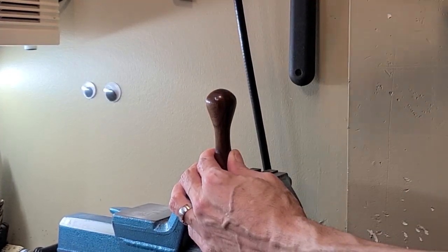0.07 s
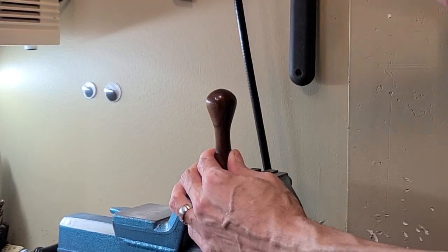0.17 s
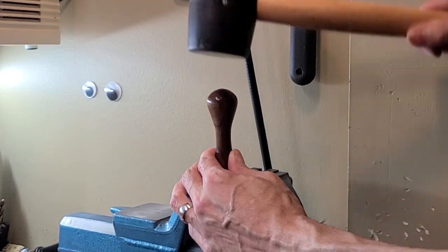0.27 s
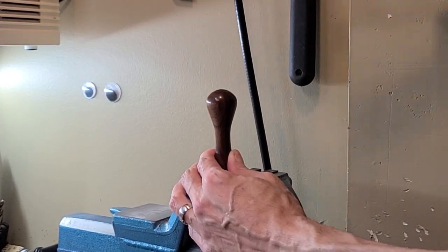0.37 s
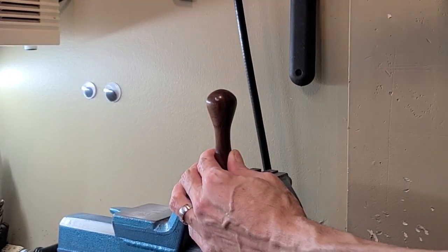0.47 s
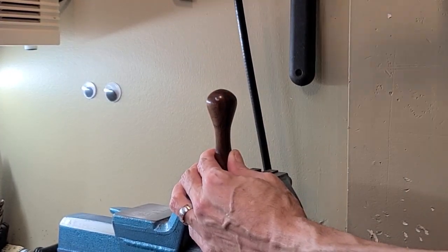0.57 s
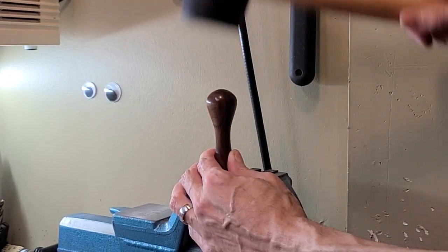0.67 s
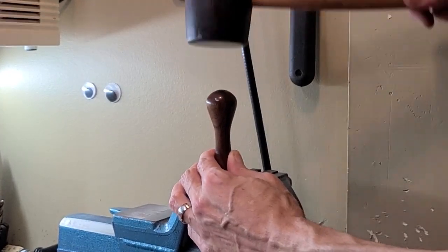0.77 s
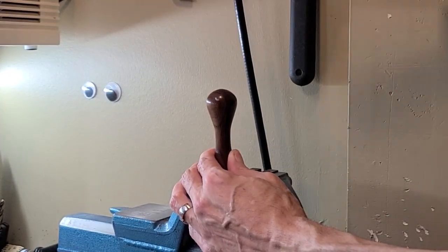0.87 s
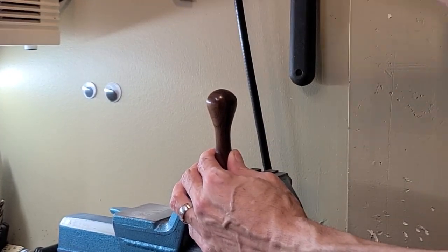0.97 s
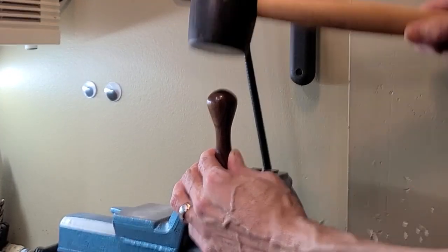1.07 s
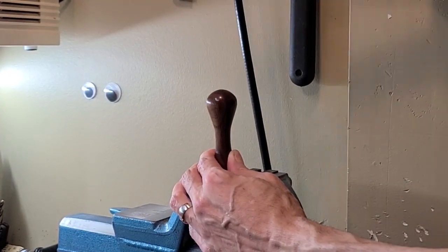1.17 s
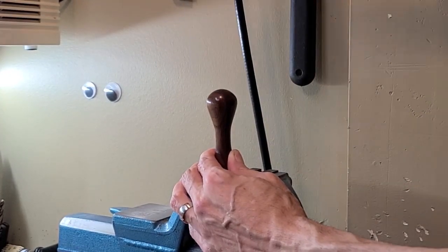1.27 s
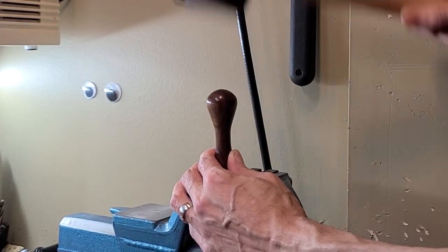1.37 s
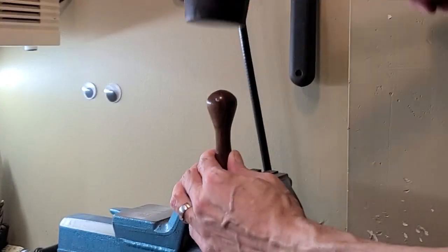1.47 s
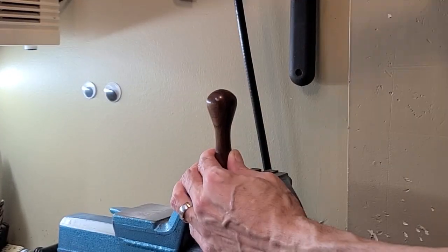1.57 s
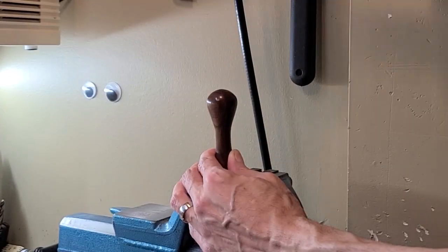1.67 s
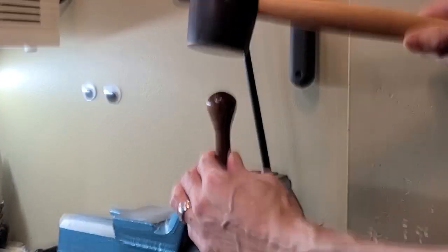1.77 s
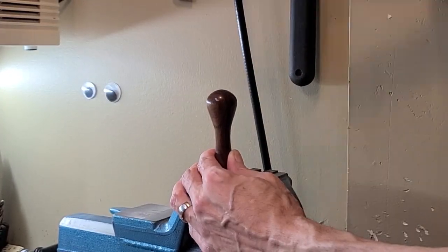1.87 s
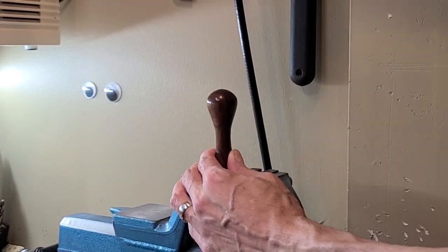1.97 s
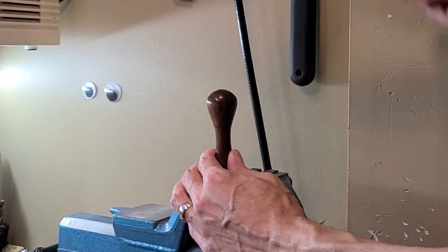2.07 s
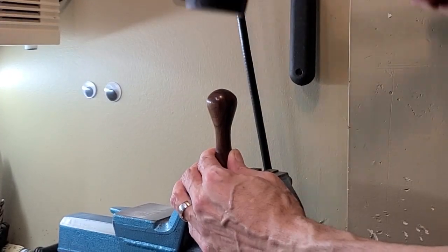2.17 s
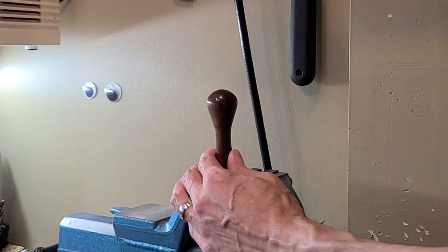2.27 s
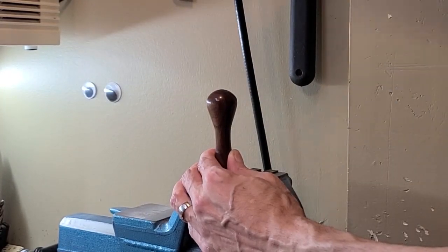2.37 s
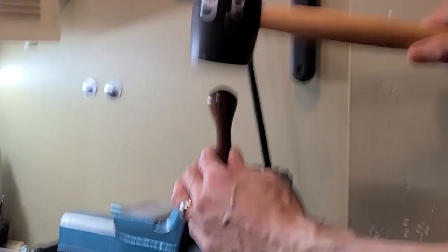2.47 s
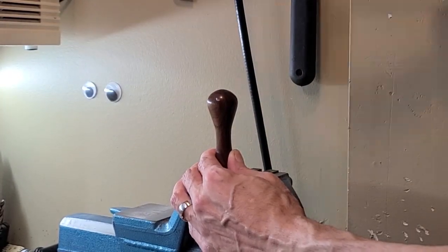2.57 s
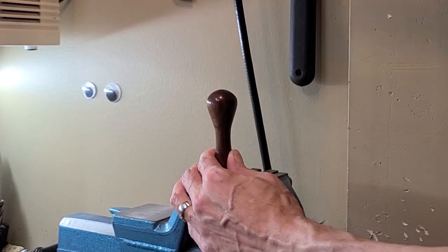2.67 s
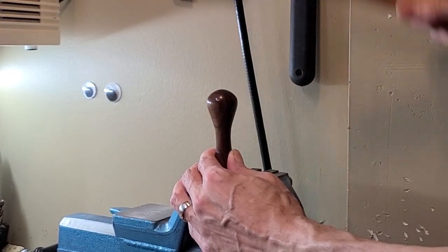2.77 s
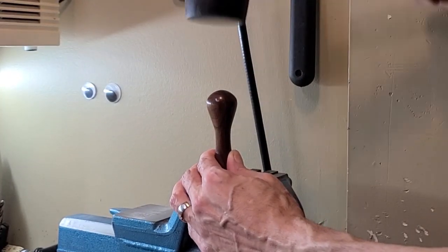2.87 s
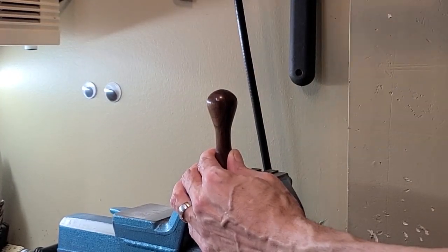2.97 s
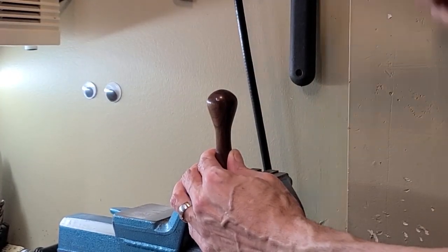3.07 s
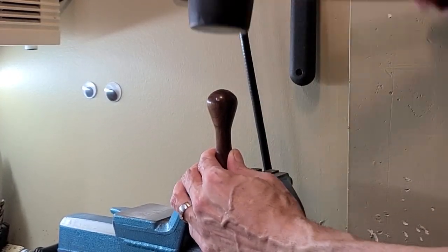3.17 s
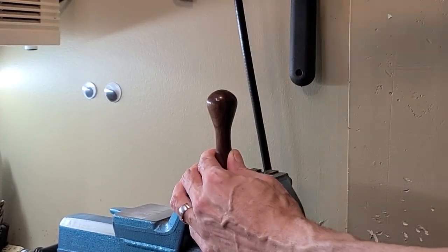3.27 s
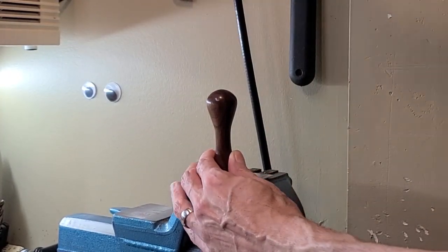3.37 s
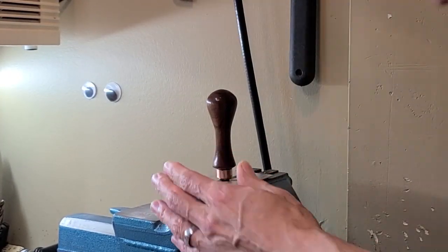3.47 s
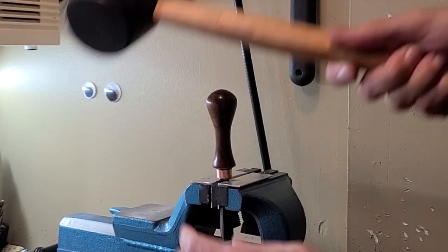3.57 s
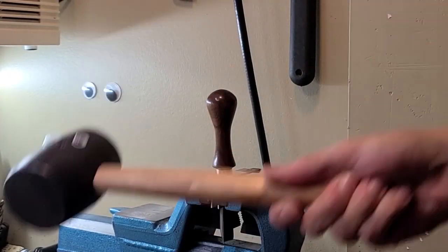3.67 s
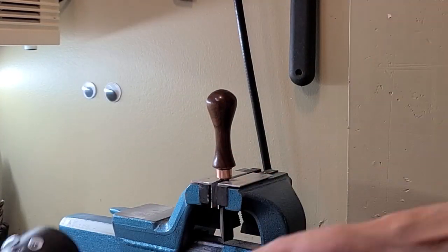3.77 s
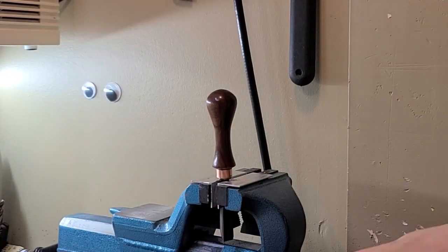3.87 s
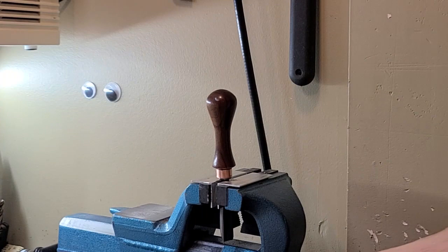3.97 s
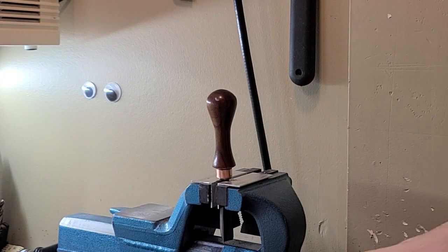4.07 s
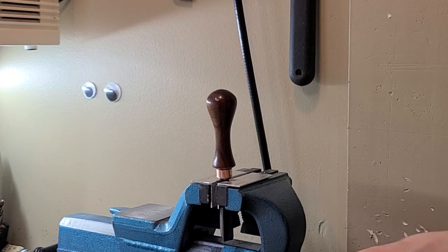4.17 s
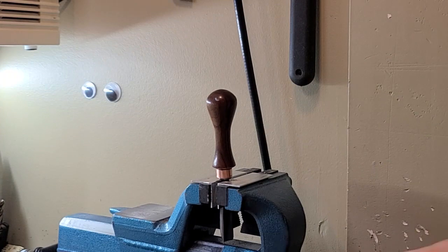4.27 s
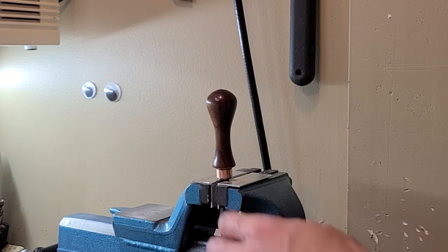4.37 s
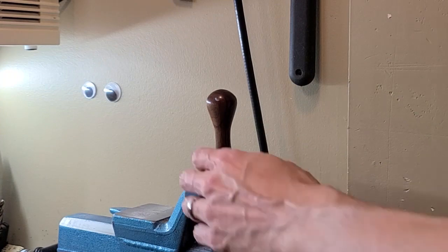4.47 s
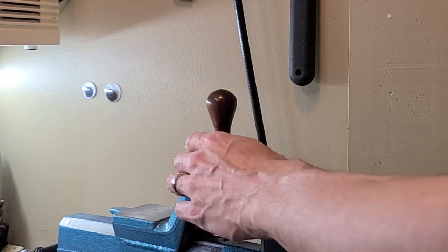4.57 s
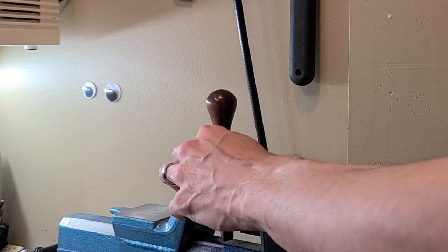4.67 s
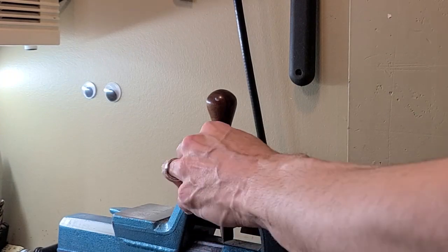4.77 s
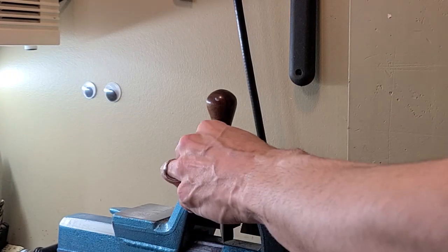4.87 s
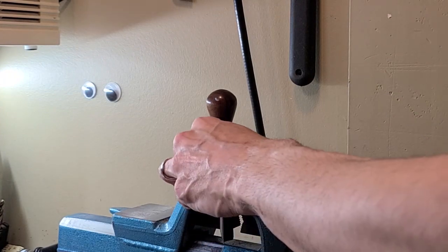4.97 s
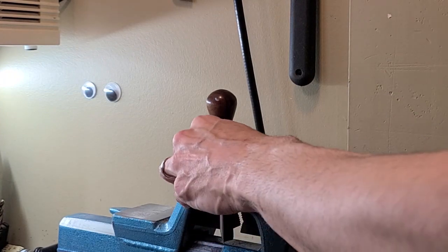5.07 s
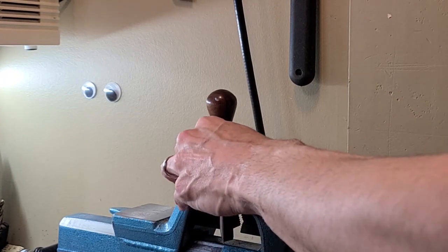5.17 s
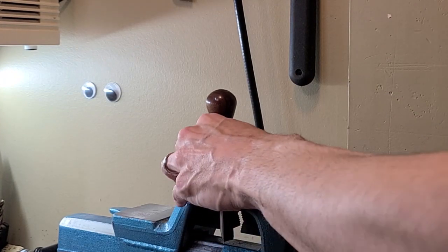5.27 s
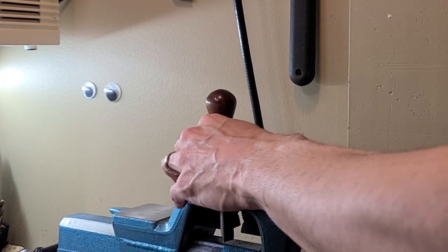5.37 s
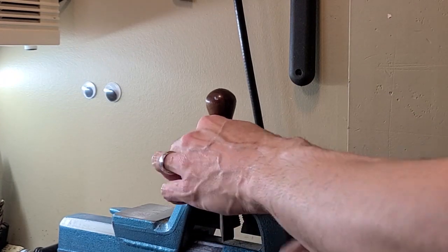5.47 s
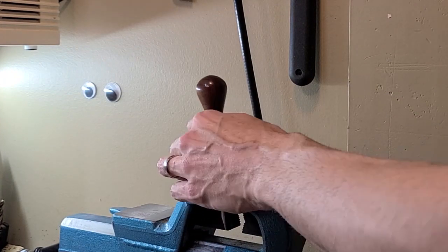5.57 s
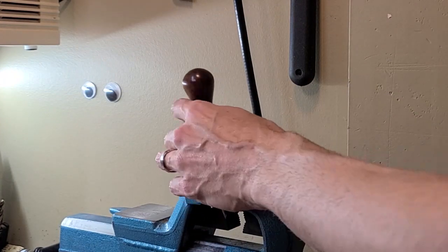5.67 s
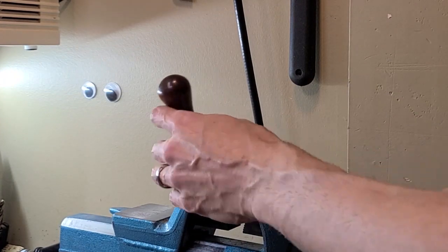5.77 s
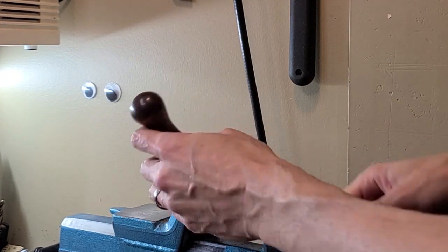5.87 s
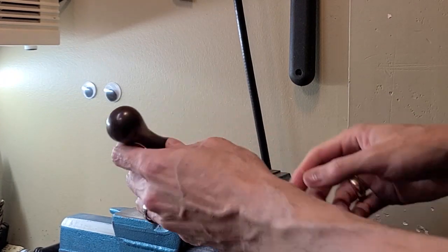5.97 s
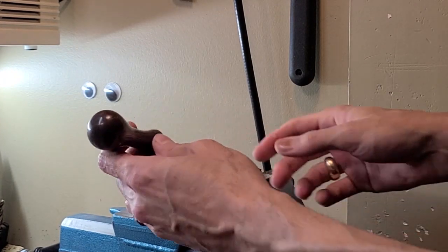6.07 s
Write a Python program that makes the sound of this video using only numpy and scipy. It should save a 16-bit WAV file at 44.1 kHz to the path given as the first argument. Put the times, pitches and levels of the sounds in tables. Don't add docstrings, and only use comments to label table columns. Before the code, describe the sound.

Nine steady, loud mallet blows, each a blunt thud with a woody crack, short metallic rattle and low ringing bench tail. Then only still air and faint hum, broken by a small ringing steel clink and a brief clack. Finally irregular bright knocks, short gritty scrapes and dry skin rubs as the tool is pulled from the vise. Close phone pickup in a small room, peaks slightly rounded.

```python
import sys
import numpy as np
from scipy import signal
from scipy.fft import rfft, irfft, next_fast_len
from scipy.io import wavfile
from scipy.ndimage import uniform_filter1d

SR = 44100
rng = np.random.default_rng(int(sys.argv[2]) if len(sys.argv) > 2 else 0)


def waveform_to_disk(signal):
    frames = np.transpose(np.atleast_2d(signal))
    scaled = np.clip(frames, -1, 1) * 32767
    samples = np.round(scaled).astype(np.int16)
    wavfile.write(sys.argv[1], SR, samples)


def voltage_ratio(decibels):
    exponent = np.asarray(decibels, float) / 20
    return 10 ** exponent


N = 270320


def unit(x):
    return x / np.sqrt(np.mean(x ** 2))


def along(table, hz):
    table_hz, values = np.array(table).T
    return np.interp(np.log(hz), np.log(table_hz), values)


def sides(pan_db):
    return voltage_ratio(np.array([[pan_db], [-pan_db]]) / 2)


def seconds(count):
    return np.arange(count) / SR


def fade(t, t60):
    return np.exp(-np.log(1000) * t / t60)


def bumps(shape, width):
    return uniform_filter1d(rng.standard_normal(shape), int(width)) * np.sqrt(int(width))


def bin_hz(count):
    return np.maximum(np.fft.rfftfreq(count, 1 / SR), 1)


def noise(colour, count=N, alike_hz=870.0, grain_db=0., lumps_db=0., tilt_db=0.):
    grain = grain_db * np.minimum(rng.exponential(size=count), 4.5)
    flutter = .7 * lumps_db * bumps(count, 250.)
    white = rng.standard_normal((2, count)) * voltage_ratio(grain + flutter)
    hz = bin_hz(count)
    peaks_db = lumps_db * bumps(len(hz), 170. * count / SR)
    tilt = tilt_db * np.log2(np.maximum(hz, 700.) / 3000.)
    mid, side = rfft(white) * voltage_ratio(along(colour, hz) + peaks_db + tilt)
    side = side / np.sqrt(1 + (alike_hz / hz) ** 2)
    return unit(irfft([mid + side, mid - side], count))


def add(out, s, x):
    i = int(round(s * SR))
    x = x * np.minimum(np.linspace(8, 0, x.shape[1]), 1)
    a, b = max(i, 0), min(i + x.shape[1], N)
    out[:, a:b] += x[:, a - i:b - i]


def ring(modes, scatter_db, drift, push_s=1e-5):
    out = np.zeros((2, int(SR * max(mode[2] for mode in modes)) + 1))
    for (hz, db, t60, *pan_db), (a, b) in zip(modes, rng.standard_normal((len(modes), 2))):
        r = fade(1 / SR, t60)
        w = 2 * np.pi * hz * (1 + drift * a) / SR
        impulse = signal.unit_impulse(int(t60 * SR) + 1)
        wave = signal.lfilter([0, r * np.sin(w)], [1, -2 * r * np.cos(w), r * r], impulse)
        out[:, :len(wave)] += voltage_ratio(db + scatter_db * b) * sides(sum(pan_db)) * wave
    onset = 1 - np.exp(-np.minimum(seconds(out.shape[1]) / push_s, 10) ** 2)
    return out * onset


def skid(modes, scatter_db, t60):
    t = seconds(int(t60 * SR) + 8)
    touch = rng.standard_normal(4096)[:len(t)] * fade(t, t60) * (1 - fade(t, .3 * t60))
    body = ring(modes, scatter_db, .006)
    right_touch = .7 * touch + .7 * np.roll(touch, 9)
    out = np.array([signal.fftconvolve(body[0], touch), signal.fftconvolve(body[1], right_touch)])
    return out / abs(out).max()


def stroke(t, hold_s):
    rise_share, release_t60_s = 0.35, .13
    rise = np.minimum(t / (rise_share * hold_s), 1) ** 2
    return rise * fade(np.maximum(t - (1 + rise_share) * hold_s, 0), release_t60_s)


# pitch_hz, level_db, t60_s, left_minus_right_db
PUSH_MODES = [(42.2, -28.0, 0.497, 1.1), (52.9, -37.3, 0.497, 2.5), (86.3, -7.3, 0.111, 2.4),
              (205.9, -28.8, 0.218, 0.5), (299.7, -23.5, 0.103, 4.9), (468.8, -13.8, 0.051, 3.2),
              (589.8, -14.1, 0.061, -1.1), (684.8, -28.5, 0.086, 8.0), (766.3, -16.6, 0.046, 3.1),
              (1155.2, -35.7, 0.2, -6.0), (1386.8, -18.5, 0.023, 3.6)]
# pitch_hz, level_db, t60_s, left_minus_right_db
PULL_MODES = [(33.6, -29.0, 0.497, 1.4), (68.6, -18.0, 0.24, 3.4), (119.4, -16.4, 0.234, 2.1),
              (145.5, -30.8, 0.188, 0.4), (170.6, -18.8, 0.067, 1.1), (222.8, -22.0, 0.137, 1.2),
              (241.5, -20.1, 0.138, 4.5), (310.5, -18.4, 0.181, 1.5), (366.9, -22.9, 0.117, -1.1),
              (423.2, -19.1, 0.124, -3.8), (452.7, -24.5, 0.145, 8.0), (527.2, -28.2, 0.156, 2.8),
              (563.5, -34.2, 0.17, -5.8), (728.2, -24.9, 0.12, 6.4), (845.6, -19.3, 0.064, 2.5),
              (1012.8, -27.2, 0.13, 0.7), (1362.8, -28.5, 0.093, -0.8)]


def bench(scatter_db, drift, light_db=0., push_s=1e-5):
    def lightened(modes):
        return [(hz, db + light_db * np.log2(hz / 320.0), *rest) for hz, db, *rest in modes]

    push = ring(lightened(PUSH_MODES), scatter_db, drift, push_s)
    pull = ring(lightened(PULL_MODES), scatter_db, drift, push_s)
    return push - pull


# pitch_hz, density_db_per_hz
CLATTER_COLOUR = [(35, -37), (60, 3), (103, -7.5), (176, -6.5), (301, -9), (371, -9), (593, -7), (666, -22),
                  (749, -10), (2190, -26.5), (4970, -39.5), (6430, -47.5), (16000, -42)]
# pitch_hz, t60_s
CLATTER_DECAY = [(60, 0.95), (160, 0.44), (420, 0.26), (1100, 0.21), (2900, 0.25), (7700, 0.1),
                 (15000, 0.067)]


def clatter():
    count = 1 << 14
    t, hz = seconds(count), bin_hz(count)
    spec = rfft(noise(CLATTER_COLOUR, count=count, alike_hz=450., grain_db=1.5, lumps_db=2.2))
    out = np.zeros((2, count))
    for centre_hz in 60 * 2. ** np.arange(9):
        share = np.cos(np.pi / 2 * np.clip(np.log2(hz / centre_hz), -1, 1)) ** 2
        share = share * hz / (hz + 900.)
        knee = np.exp(-(t * centre_hz ** .45 / 9.) ** 3)
        decay = fade(t, along(CLATTER_DECAY, centre_hz))
        out += irfft(spec * share, count) * knee * (1 - fade(t, 0.016)) * decay
    return voltage_ratio(-11.0) * out


# pitch_hz, density_db_per_hz
BUZZ_COLOUR = [(1500, -17.5), (3000, -5), (4200, -2.5), (5100, -7), (6300, -1.5), (8000, -4.5),
               (9200, -12.5), (11300, -10.5), (15500, -15)]


def buzz(level_db, length_s):
    top_hz, top_share, tail_db, tail_t60_s = 8900, .88, -19.5, 0.43
    count = 1 << 14
    t, hz = seconds(count), bin_hz(count)
    swell = (1 - fade(t, 0.018)) * voltage_ratio(level_db - 36.0) * sides(4.6)
    chatter = noise(BUZZ_COLOUR, count=count, grain_db=1.5, lumps_db=1.6) * voltage_ratio(1.4 * bumps(count, 380.0))
    top = irfft(rfft(chatter) / (1 + (top_hz / hz) ** 8), count)
    top_part = top * voltage_ratio(1.0) * np.exp(-(t / (top_share * length_s)) ** 2)
    hold = np.exp(-(t / length_s) ** 2) + voltage_ratio(tail_db) * fade(t, tail_t60_s)
    return swell * (top_part + (chatter - top) * hold)


# start_s, level_db, hardness_db_per_octave
BLOWS = [
    (-.0615, 0.5, -0.2),
    (.2832, -0.4, -0.92),
    (0.742, 0.5, -0.5),
    (1.0867, 0.25, 0),
    (1.4394, 0.97, 0.25),
    (1.79, 1, 0.4),
    (2.1511, 1, 0.44),
    (2.5043, 1.5, -0.27),
    (2.8403, 0.5, 0.56),
    (3.1536, 0.5, 0.4),
]
# crack_db, crack_brightness_db_per_octave, buzz_db, buzz_length_s
RATTLES = [
    (23, 0.1, 5, 0.068),
    (21, 5.5, 6, 0.064),
    (-13, 2, 1, 0.081),
    (6, 5.5, 3, 0.074),
    (-1.5, 0.7, 1, 0.085),
    (3.5, 4, 2.5, 0.086),
    (-13, 0, 0, 0.098),
    (-10, -2.5, 1.5, 0.095),
    (2.5, 1.5, 2, 0.089),
    (-1.5, -3, 2.5, 0.089),
]
# pitch_hz, level_db, t60_s, left_minus_right_db
HANDLE_MODES = [(1015, -21, .1, -6), (1185, -30, .12, 6), (1290, -31, .06, -6), (1441, -28, .09, 5),
                (1667, -29, 0.089, -5), (1760, -31, 0.096, 5), (1927, -33.5, .1, 1), (2086, -34.5, .08, 0),
                (2428, -41.5, 0.043, -1)]
# pitch_hz, level_db, t60_s, left_minus_right_db
HANGING_MODES = [(38, -44, 0.63, 5.5), (65.6, -41.5, 1.2, 7), (226, -56, 1.4, -0.5), (322, -60.5, 0.46, 6),
                 (447, -51, 1.3, 4.5), (470, -51, 0.5, 2), (505, -54, 1.2, -0.5), (764, -65, 0.81, 1),
                 (870, -61.5, 0.38, 1), (1000, -69, .8, 1.5), (1210, -70, .6, 1.5), (1370, -59.5, .4, 0.5)]
# pitch_hz, density_db_per_hz
FLOOR_COLOUR = [(20, -16), (40, 4.5), (90, -1), (170, -15.5), (300, -20), (600, -29.5), (1200, -53),
                (7000, -95.5)]
# pitch_hz, density_db_per_hz
SCRAPE_COLOUR = [(880, -22), (1500, -2), (2000, -0.5), (2970, 2), (4640, -2.5), (5330, -8.5), (6830, -1.5),
                 (8000, -12.5), (8830, -19), (11900, -21), (16000, -38)]


def mallet():
    out, t, slow = np.zeros((2, N)), seconds(1 << 14), seconds(1 << 15)
    for (s, db, hard_db), (crack_db, bright_db, buzz_db, buzz_s) in zip(BLOWS, RATTLES):
        add(out, s, voltage_ratio(db + 2 * hard_db) * bench(.9, .003, light_db=hard_db))
        add(out, s, voltage_ratio(db + 1.0 + 3.0 * hard_db) * ring(HANDLE_MODES, 1.7, .02, push_s=0.0034))
        add(out, s, voltage_ratio(db) * ring(HANGING_MODES, 1.5, .002))
        floor = noise(FLOOR_COLOUR, count=len(slow)) * (1 - fade(slow, 0.077)) * fade(slow, 0.83)
        add(out, s, voltage_ratio(db - 33.5) * floor)
        add(out, s, voltage_ratio(db) * clatter())
        crack = noise(SCRAPE_COLOUR, count=len(t), alike_hz=3000., lumps_db=1.0, tilt_db=bright_db)
        add(out, s, voltage_ratio(crack_db - 35.5) * sides(2.3) * crack * fade(t, 0.065))
        add(out, s, buzz(buzz_db, buzz_s))
    return out


def falling_head():
    lead_s, lead_db = .0048, -26.5
    out = np.zeros((2, N))
    lead = -np.sin(np.linspace(0, np.pi, int(lead_s * SR))) * voltage_ratio(lead_db) * sides(2.5)
    for s, db, _ in BLOWS[1:]:
        add(out, s - lead_s, voltage_ratio(db) * lead)
    return out


# start_s, level_db, skid_t60_s
LANDINGS = [(.305, -28.5, .02), (.327, -30, .03), (.372, -39.5, .03), (0.767, -28, 0.037),
            (.787, -26, 0.046), (.832, -36, 0.033), (.907, -44, .03), (1.093, -25, 0.018),
            (1.122, -30.5, .02), (1.131, -28, .03), (1.175, -37, .03), (1.462, -27, .03), (1.484, -27, .03),
            (1.522, -36.5, 0.033), (1.812, -25.5, 0.025), (1.84, -30, 0.036), (1.873, -31, .02),
            (1.914, -40.5, 0.027), (2.1735, -25.5, 0.035), (2.2269, -30, 0.023), (2.245, -34, .02),
            (2.2685, -37, 0.032), (2.5272, -26.5, .02), (2.5681, -24.5, 0.039), (2.595, -32, .03),
            (2.6594, -50, .03), (2.8475, -28.5, .015), (2.866, -27, 0.019), (2.9028, -26, .03),
            (2.9318, -30.5, .02), (3.0046, -54, .02), (3.1756, -25.5, 0.021), (3.198, -29, 0.022),
            (3.2307, -29, 0.047), (3.3064, -48.5, .02)]
# pitch_hz, level_db, t60_s
LOOSE_MODES = [(3050, -9, .008), (4200, -5, .016), (5590, -8, .01), (5960, -5, .014), (6340, 0, .018),
               (7130, -4, .01), (7870, -4, .008), (9220, -13, .005), (11300, -12, .008), (12800, -13, .006),
               (14900, -12, .006)]


def landings():
    out = np.zeros((2, N))
    for s, db, t60 in LANDINGS:
        skid_t60_s = np.clip(1.4 * t60, .004, .09)
        add(out, s, voltage_ratio(db + .8) * sides(6.) * skid(LOOSE_MODES, 2., skid_t60_s))
    return out


# start_s, level_db, length_s
HOPS = [
    (0.009, -47, 0.028),
    (0.433, -57.5, 0.043),
    (0.809, -39.5, 0.042),
    (1.909, -48.5, 0.047),
    (2.559, -49, .1),
]


def vise_handle():
    out, t = np.zeros((2, N)), seconds(1 << 13)
    colour = [(500, -22.5), (800, -7), (1000, -2), (1290, -10), (1380, 9.5), (1450, -15), (2200, -16),
              (5000, -50)]
    for s, db, length_s in HOPS:
        hop = noise(colour, count=len(t), alike_hz=2494.0)
        add(out, s, voltage_ratio(db) * hop * (1 - fade(t, .03)) * np.exp(-(t / length_s) ** 2))
    return out


# start_s, peak_db, left_minus_right_db, brightness_db_per_octave
TICKS = [(0.096, -49, 7, -2), (0.116, -52, 7, -6), (0.134, -45.5, 5, 0), (0.178, -65, 6, 1.5),
         (0.228, -61, 1, -5), (0.4374, -48.5, 7, -8), (0.469, -53.5, 7, -8), (0.5292, -64, 6, 1),
         (0.906, -46, 8, -3.5), (1.039, -58, 3, 5), (1.052, -56, 8, 5), (1.267, -53.5, 7, -3),
         (1.284, -48.5, 9, 1), (1.3329, -57, 6, 2), (1.3461, -55, 9, 1), (1.413, -50.5, 3, 3.5),
         (1.571, -47, 6.5, -4), (1.584, -38.5, 7, -1), (1.698, -58, 14, -1), (1.9886, -55, 6, -1),
         (2.0404, -62, 6, 0), (2.1615, -29, 2, 1.5), (2.716, -53, 10, -3), (2.7621, -64, 6, 2),
         (3.083, -55, 2, 8), (3.097, -46, 2, 11), (3.112, -50.5, 0.1, 6), (3.3467, -60, 5, -2),
         (3.379, -60, 4, -2)]
# pitch_hz, density_db_per_hz
TICK_COLOUR = [(1500, -31), (3000, -1), (4200, -8.5), (6300, -1.5), (8000, -6), (10000, -30.5),
               (14000, -21)]


def loose_things():
    out, t = np.zeros((2, N)), seconds(4096)
    shape = (1 - fade(t, .003)) * (fade(t, .022) + voltage_ratio(-11.) * fade(t, .13))
    for s, db, pan_db, bright_db in TICKS:
        tick = noise(TICK_COLOUR, count=len(t), lumps_db=3.0, tilt_db=bright_db)
        add(out, s - .001, voltage_ratio(db - 6.5) * sides(pan_db) * tick * shape)
    return out


# pitch_hz, level_db, t60_s
STEEL_MODES = [(593, -11.5, 0.32), (1162, 4, .05), (1720, 3, .025), (2512, 0, 0.52), (2675, -8.5, 0.63),
               (3030, 10, 0.025), (3170, 1, 0.065), (3570, -7, 0.41), (3990, -12, 0.47), (5865, -12, 0.27),
               (6848, -17.5, 0.38), (7973, -20, 0.13), (10320, -23.5, 0.29), (13380, -36, .27)]
# pitch_hz, level_db, t60_s
STEEL_FREE_MODES = [(1410, -13.5, 0.48), (4651, -23, 0.55), (8845, -39, 0.45)]


def clink():
    start_s, level_db = 4.2608, -36.5
    out, t = np.zeros((2, N)), seconds(8192)
    steel = ring(STEEL_MODES, 0., 0., push_s=0.0004)
    settle = np.exp(-(seconds(steel.shape[1]) / 0.21) ** 4)
    add(out, start_s, voltage_ratio(level_db) * sides(-9.0) * steel * settle)
    add(out, start_s, voltage_ratio(level_db) * sides(-7.0) * ring(STEEL_FREE_MODES, 0., 0., push_s=0.002))
    colour = [(300, -36.5), (850, -34), (1150, -6), (1800, -3), (3100, 10), (4600, -10.0), (5600, -34.0),
              (9000, -60)]
    clack = noise(colour, count=len(t), lumps_db=0.5) * (fade(t, 0.046) + voltage_ratio(-6.5) * fade(t, 0.17))
    add(out, start_s, voltage_ratio(level_db + 4.0) * sides(2.2) * clack)
    return out


# pitch_hz, level_db, t60_s
PIECE_MODES = [(1165, -4, .08), (1380, -5, .11), (1906, 1, 0.055), (2568, -6, .08), (2955, -6, .15),
               (4170, -2.5, 0.034), (6096, -15, .17), (6713, -2, .09), (7100, -6, .12), (7890, -3, .08)]


def piece_set_down():
    start_s, level_db, skid_t60_s = 4.582, -29, .055
    out = np.zeros((2, N))
    add(out, start_s, voltage_ratio(level_db) * sides(4.) * skid(PIECE_MODES, 0., skid_t60_s))
    return out


# start_s, peak_db, boom_db, t60_s, brightness_db_per_octave
KNOCKS = [(4.2596, -27, -43, 0.16, -17), (4.5842, -30, -38, 0.14, 2), (5.2706, -42, -48, 0.15, -11),
          (5.3441, -30.5, -37, 0.11, -7.5), (5.3678, -20.5, -39, 0.08, -2.5), (5.4977, -25, -35.5, 0.1, -5),
          (5.5482, -34.5, -60, 0.074, -1), (5.608, -18, -22, 0.12, -1), (5.637, -20, -39, 0.15, 5.5),
          (5.7164, -34, -29.5, 0.1, 6), (5.7351, -29.5, -36.5, 0.12, 7), (6.089, -43.5, -54, 0.068, 2.5)]
# pitch_hz, level_db, t60_s, left_minus_right_db
JAW_MODES = [(265, -10, 0.024, 13.5), (652, -13.5, 0.22, 4), (1166, 0.5, 0.052, 5.5), (1374, 2, 0.084, -2),
             (1680, -4.5, 0.0564, -1.5), (1990, 4, 0.038, 4), (2450, -7.5, 0.019, 6)]


def knocks():
    jaws_db, jaws_duller_db_per_db = -18, 0.21
    out, t = np.zeros((2, N)), seconds(8192)
    for s, db, boom_db, t60, bright_db in KNOCKS:
        add(out, s, voltage_ratio(boom_db + 7.5) * bench(3.2, 0.0418, light_db=3.0, push_s=0.0026))
        jaws_level_db = db + jaws_db - jaws_duller_db_per_db * bright_db
        add(out, s, voltage_ratio(jaws_level_db) * ring(JAW_MODES, 2.5, .025, push_s=.001))
        scuff = noise([(150, -60)] + SCRAPE_COLOUR, count=len(t), grain_db=3.5, lumps_db=3., tilt_db=bright_db)
        add(out, s, voltage_ratio(db - 10.5) * sides(4.7) * scuff * (1 - fade(t, 0.006)) * fade(t, max(t60, .02)))
    return out


# start_s, pitch_hz, level_db, t60_s, left_minus_right_db
PINGS = [(5.369, 11500, -51, .14, 4), (5.738, 4300, -50, .05, 3), (5.84, 5800, -56, .04, 3),
         (6.088, 1350, -54, .06, 4), (6.088, 4265, -54, .07, 6), (6.09, 4535, -52, .09, 6),
         (6.095, 4400, -57, .05, 6), (6.088, 8030, -61, .06, 6), (5.717, 400, -26, .07, 2),
         (5.718, 640, -28, .05, 2), (5.732, 260, -26, .06, 2), (5.76, 105, -40, .2, 2),
         (5.64, 95, -26, .15, 2), (4.015, 85, -60, .25, 2), (5.613, 1105, -25, .07, 3),
         (5.61, 430, -34, .12, 2), (5.955, 1300, -58, .15, 3), (5.89, 1330, -64, .2, 3),
         (4.03, 52, -62, .3, 2), (4.29, 45, -50, .4, 2), (4.268, 110, -42, .12, 2),
         (4.262, 310, -41, .12, 2), (4.585, 120, -48, .09, 2), (4.585, 500, -52, .1, 2),
         (5.9, 7660, -60, .15, 1.5), (5.925, 7600, -60, .1, 1.5), (5.963, 7490, -57, .08, 1.5),
         (5.405, 13350, -65, .1, 3), (5.499, 1350, -36, .04, 3), (5.37, 2000, -38, .03, 3),
         (5.348, 11600, -62, .08, 4), (5.401, 3300, -36, .005, 3), (5.964, 4300, -54, .04, 3),
         (4.02, 1155, -80, .3, 2), (4.2607, 3000, -26, .008, -3), (4.268, 190, -44, .15, 2),
         (5.375, 11300, -58, .08, 4)]


def pings():
    out = np.zeros((2, N))
    for s, *mode in PINGS:
        add(out, s, ring([mode], 0., 0., push_s=0.00049))
    return out


# start_s, hold_s, scrape_db, weight_over_scrape_db, skin_over_scrape_db
STROKES = [(4.014, 0.043, -77.5, -11, -6), (5.25, 0.05, -61, 13.5, -21), (5.292, 0.017, -59.5, 8, -15),
           (5.341, 0.045, -50, 4, -20), (5.396, 0.013, -37.5, -5.5, -33), (5.446, 0.05, -57.5, 8.5, -18),
           (5.498, 0.058, -57, 8.5, 0.5), (5.557, 0.085, -52, 7.5, 3), (5.605, 0.031, -37.5, 1.5, 0),
           (5.692, 0.045, -53, 7.5, 5), (5.757, 0.033, -64, 10, 5), (5.815, 0.026, -57.5, 0, 3.5),
           (5.873, 0.065, -62, -1, -2.5), (5.952, 0.015, -61, -3.5, 5)]


def drag():
    grip_s, light_rumble_db = 5.2, -31.5
    # pitch_hz, density_db_per_hz
    scrape_colour = [(1100, -30), (1600, -3), (2100, 0), (3400, -4), (4700, -6), (5600, -13), (7000, -30),
                     (9000, -60)]
    hiss_colour = [(4800, -18), (5600, -7), (6800, 0.0), (8000, -3.0), (8900, -20.0), (11500, -26), (16000, -38)]
    rumble_colour = [(35, -27), (55, 4), (100, 7.5), (200, 3.0), (300, -50.0), (600, -90)]
    body_colour = [(180, -5.5), (280, -5), (450, 2.0), (650, 5.0), (1100, -5.0), (1500, -5.0), (2000, -40),
                   (4000, -75)]
    out, t = np.zeros((2, N)), seconds(1 << 13)
    for s, hold_s, db, weight_db, skin_db in STROKES:
        scrape = noise(scrape_colour, count=len(t), grain_db=4., lumps_db=3.)
        hiss = noise(hiss_colour, count=len(t), grain_db=5.0, lumps_db=5.0)
        rumble = noise(rumble_colour, count=len(t))
        body = noise(body_colour, count=len(t), grain_db=3.0, lumps_db=3.5)
        rumble_db = -0.5 + light_rumble_db * (s < grip_s)
        weight = voltage_ratio(weight_db) * (body + voltage_ratio(rumble_db) * rumble)
        add(out, s, voltage_ratio(db) * stroke(t, hold_s) * (scrape + voltage_ratio(skin_db) * hiss + weight))
    return out * sides(2.1)


# start_s, hold_s, level_db
WHISPERS = [
    (5.288, .025, -78),
    (5.366, .012, -58),
    (5.484, 0.023, -64),
    (5.56, 0.043, -58),
    (5.604, 0.039, -42.5),
    (5.712, 0.042, -61),
    (5.815, 0.029, -66.5),
    (5.89, .04, -75),
    (5.956, 0.015, -65.5),
]
# pitch_hz, density_db_per_hz
WHISPER_COLOUR = [(8000, -29.5), (9200, -6.5), (11500, 2.5), (13500, -2.5), (16000, -5.5)]
# pitch_hz, density_db_per_hz
RUB_COLOUR = [(150, -22), (260, -3), (500, 4), (800, -10), (1150, -9.5), (1600, -19), (2300, -36.5),
              (6500, -27.5), (9000, -58)]


def skin():
    rub_start_s, rub_hold_s, rub_db = 4.958, 0.074, -53
    out, t = np.zeros((2, N)), seconds(1 << 13)
    rub = noise(RUB_COLOUR, count=len(t), grain_db=5.0, lumps_db=3.)
    add(out, rub_start_s, voltage_ratio(rub_db) * stroke(t, rub_hold_s) * rub)
    for s, hold_s, db in WHISPERS:
        whisper = noise(WHISPER_COLOUR, count=len(t), grain_db=3.5, lumps_db=3.5)
        add(out, s, voltage_ratio(db) * stroke(t, hold_s) * whisper)
    return out * sides(3.5)


# pitch_hz, density_db_per_hz
AIR_COLOUR = [(15, -31), (25, -1), (70, 2), (167, -19.5), (300, -13), (375, -25.5), (460, -23), (1500, -32),
              (1950, -67.5), (3300, -120)]
# pitch_hz, density_db_per_hz
HISS_COLOUR = [(900, -27), (1660, -3), (2600, -13), (3350, -3.5), (4000, -12), (5500, -16), (6500, -4),
               (7400, -11), (8800, -23.5), (10800, -15.5), (13000, -28.5), (16000, -43)]
# pitch_hz, rms_db
HUM_TONES = [(301, -80), (845, -96), (931, -99), (1055, -102), (1610, -104), (1723, -105)]


def workshop():
    air_db, hiss_db = -68.5, -82.5
    hum_stops_s, hum_left_db = 4.6, -9.
    t, count = seconds(N), next_fast_len(N)
    wind_down_db = hum_left_db * np.clip((t - hum_stops_s) * 10, 0, 1)
    hum = np.zeros(N)
    for hz, db in HUM_TONES:
        hum += voltage_ratio(db + 3.5 + wind_down_db) * np.sqrt(2) * np.sin(2 * np.pi * hz * t)
    air = voltage_ratio(air_db) * noise(AIR_COLOUR, count=count, alike_hz=400.)
    hiss = voltage_ratio(hiss_db) * noise(HISS_COLOUR, count=count)
    return (air + hiss)[:, :N] + hum


def scene():
    blows = mallet() + falling_head() + landings() + vise_handle() + loose_things()
    hand = clink() + piece_set_down() + knocks() + pings() + drag() + skin()
    return blows + hand + workshop()


def smear(x, haze_db, patchy_db, drop_db):
    hz, _, z = signal.stft(x, SR, nperseg=1536)
    patches = voltage_ratio(patchy_db * bumps(z.shape[:0:-1], 8.9).T)
    size = uniform_filter1d(abs(z), size=5, axis=1) * patches
    random_phase = np.exp(2j * np.pi * rng.random(z.shape))
    haze = voltage_ratio(haze_db) * size * random_phase * (hz / (hz + 38.0))[:, None]
    threshold = voltage_ratio(drop_db) * abs(z[:, hz > 1500]).mean(axis=1, keepdims=True)
    weak = (threshold / size) ** 4 * (hz > 8600)[:, None]
    return signal.istft((z + haze) / (1 + weak), nperseg=1536)[1][:, :N]


def top_cut(x):
    return signal.sosfilt(signal.butter(12, 16820, fs=SR, output="sos"), x)


def record(dry):
    rounded = np.tanh(1.1 * dry) / 1.05
    hazy = smear(rounded, haze_db=-19., patchy_db=6., drop_db=-15.)
    top_hz = 15700
    low_pass = signal.ellip(8, .3, 60, top_hz, fs=SR, output="sos")
    mix = signal.sosfilt(low_pass, hazy)
    return top_cut(mix)


dry = scene()
out = record(dry)
waveform_to_disk(out)
```